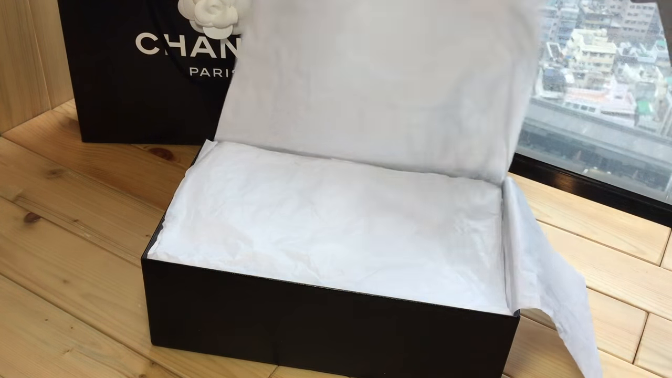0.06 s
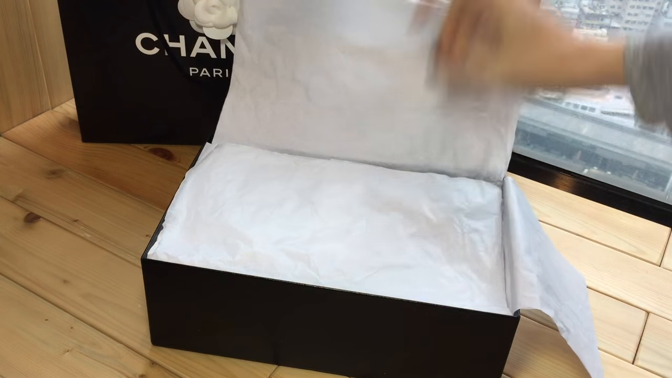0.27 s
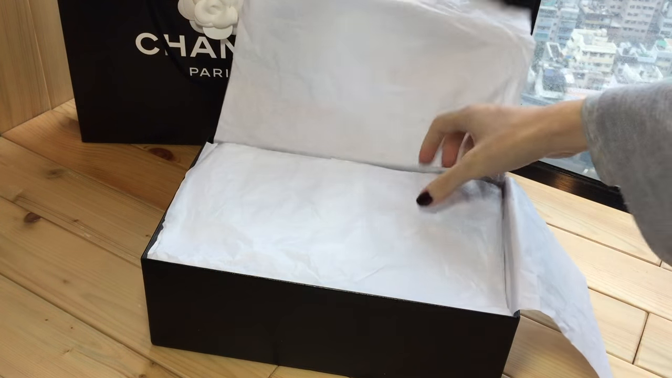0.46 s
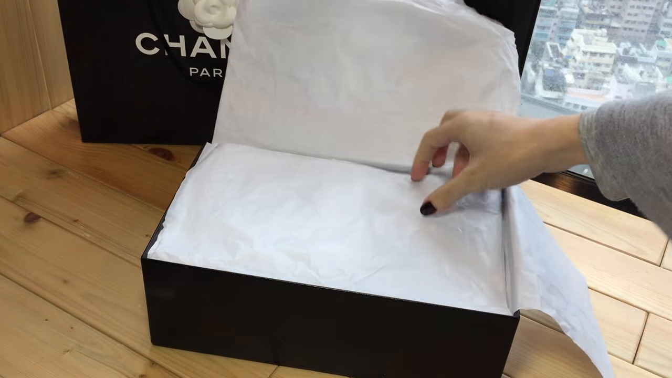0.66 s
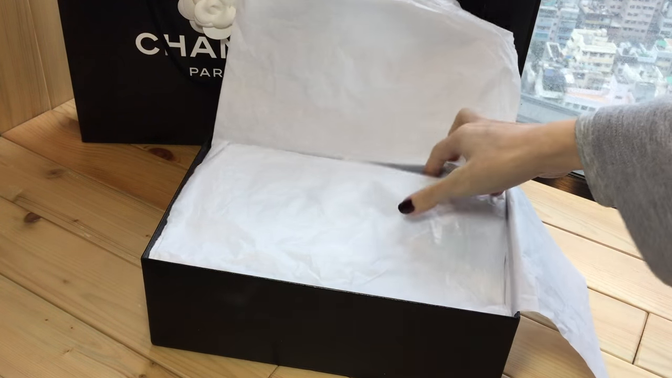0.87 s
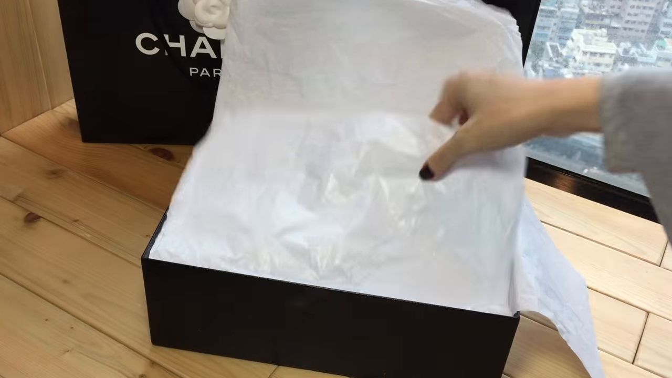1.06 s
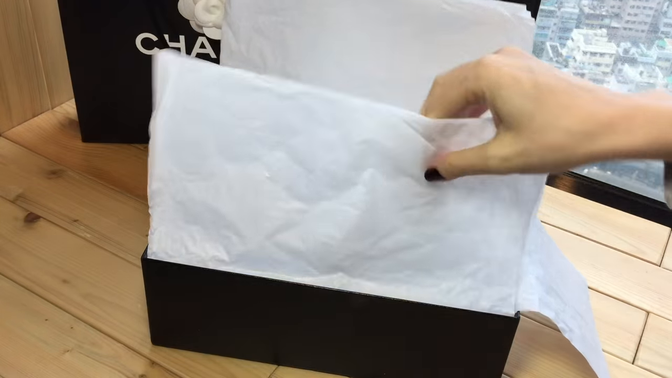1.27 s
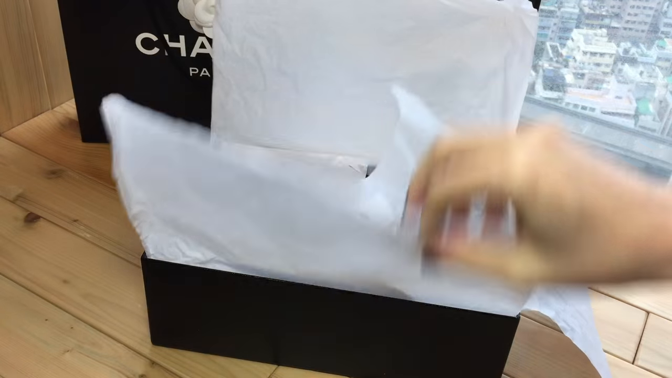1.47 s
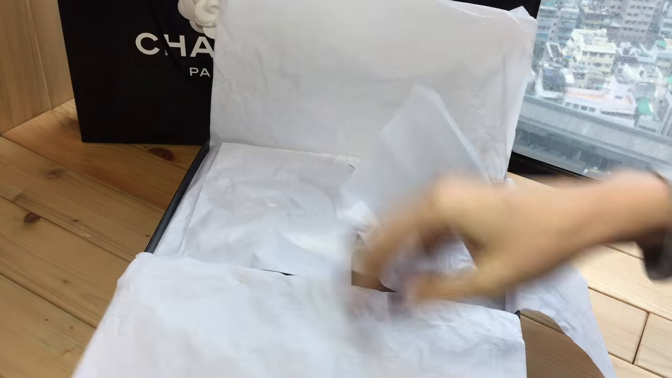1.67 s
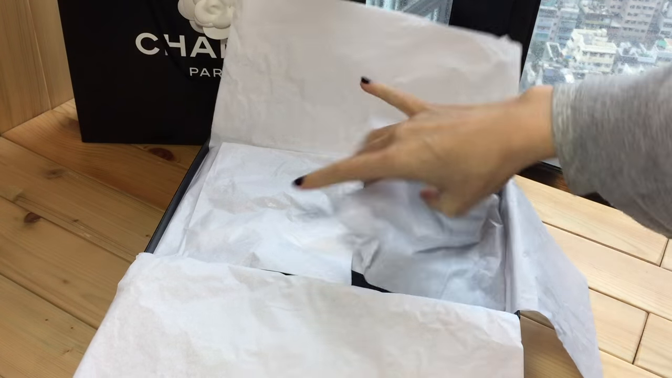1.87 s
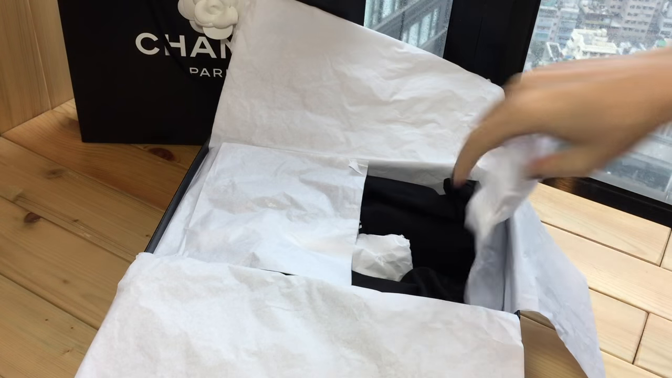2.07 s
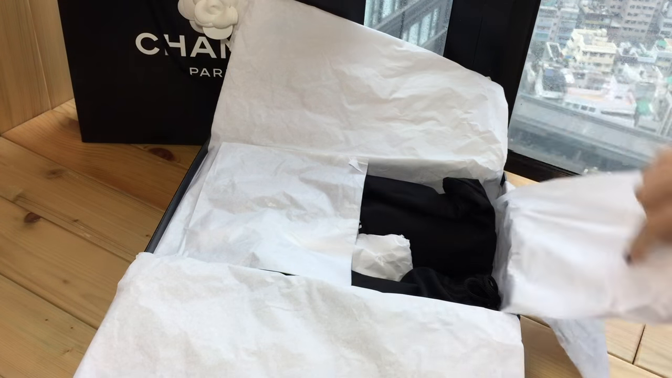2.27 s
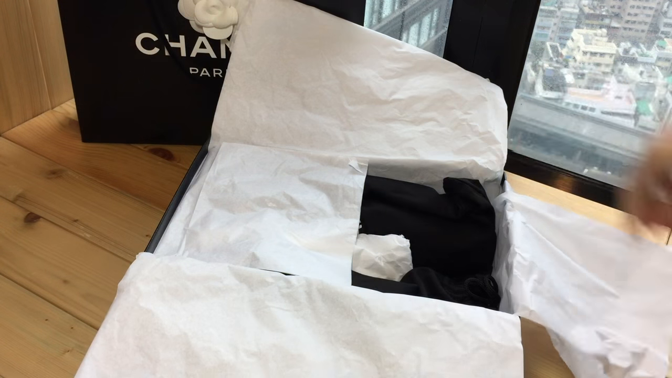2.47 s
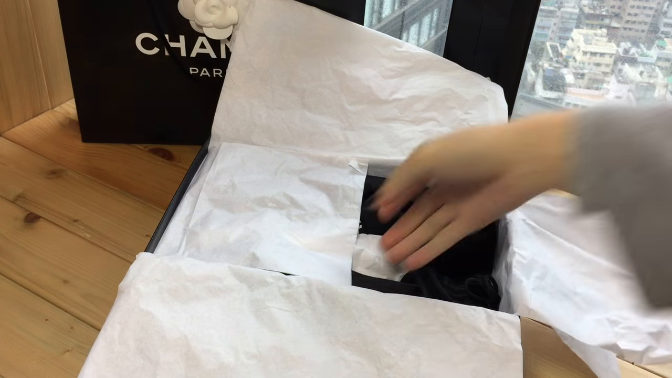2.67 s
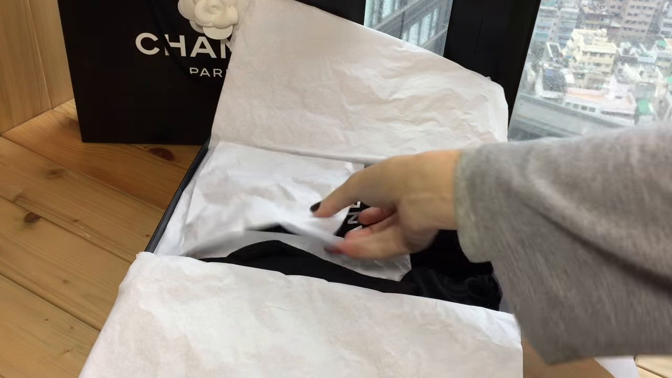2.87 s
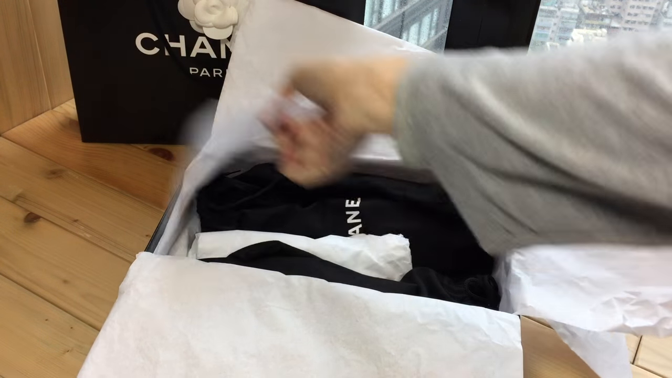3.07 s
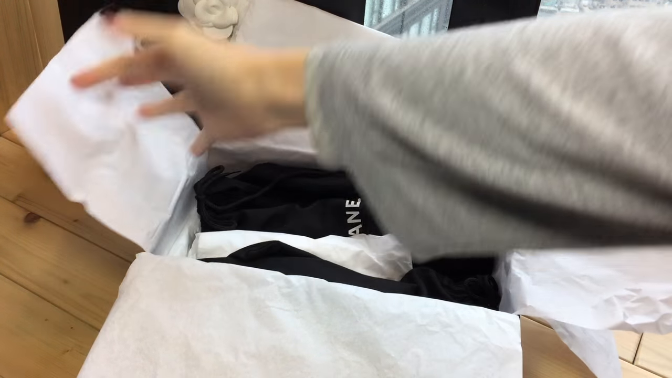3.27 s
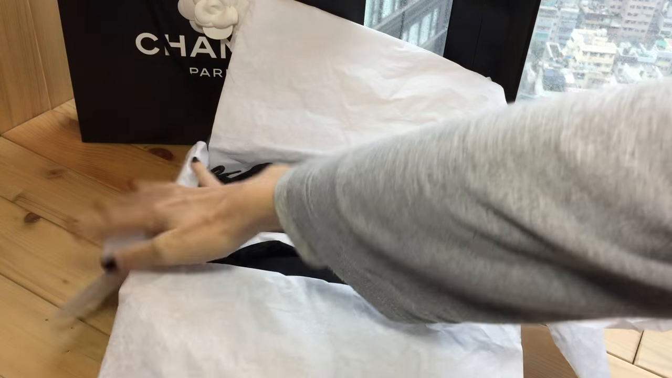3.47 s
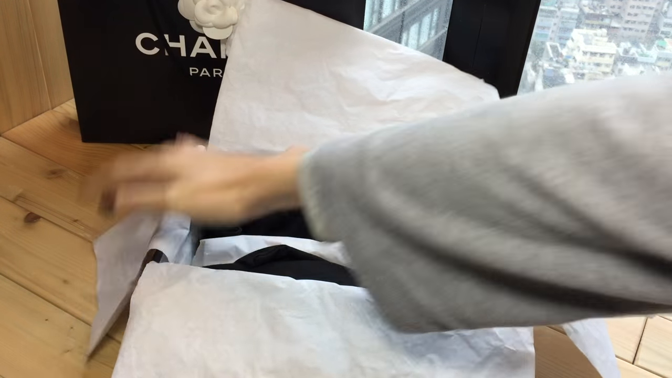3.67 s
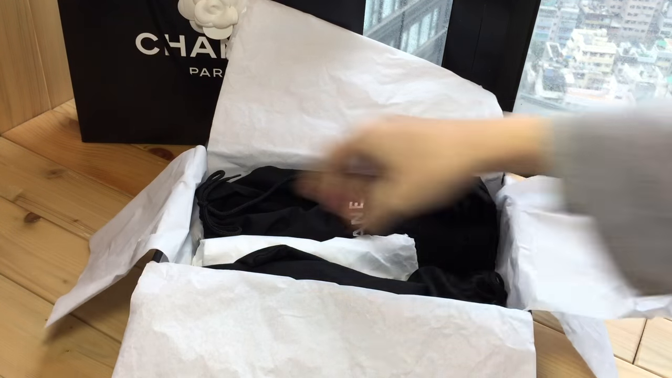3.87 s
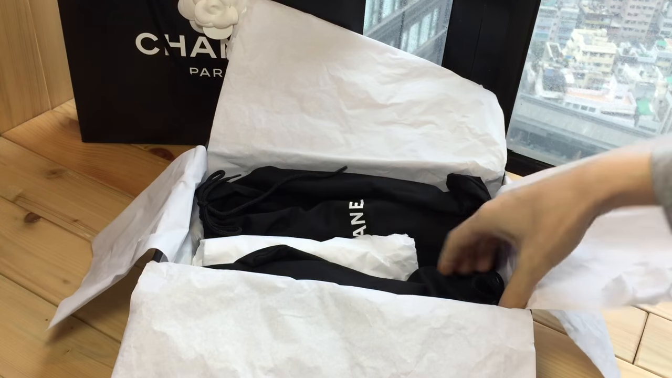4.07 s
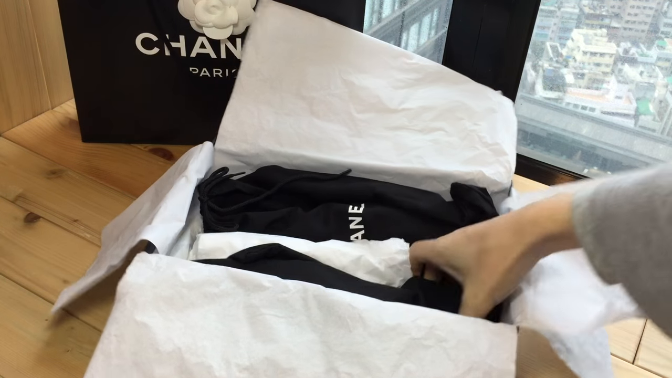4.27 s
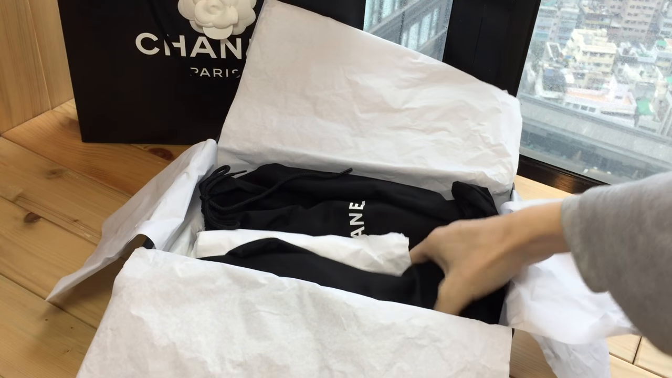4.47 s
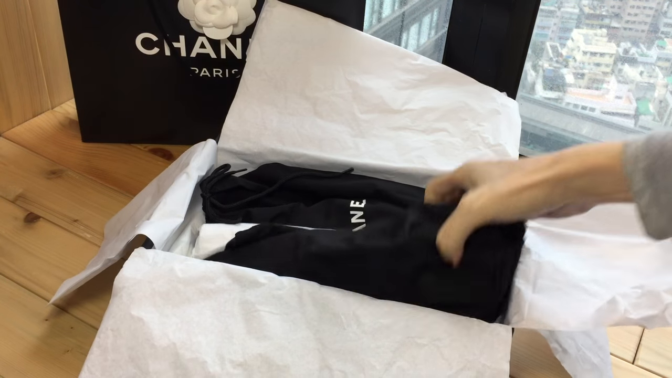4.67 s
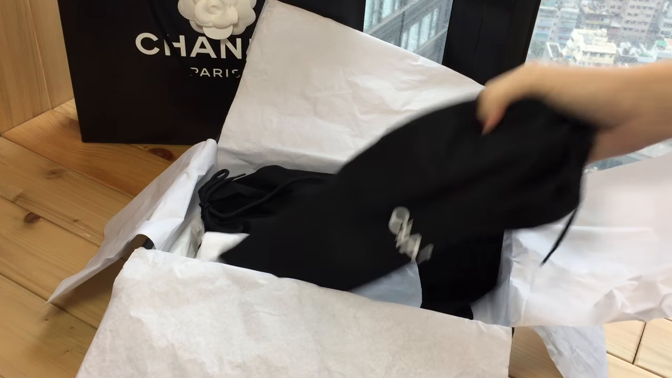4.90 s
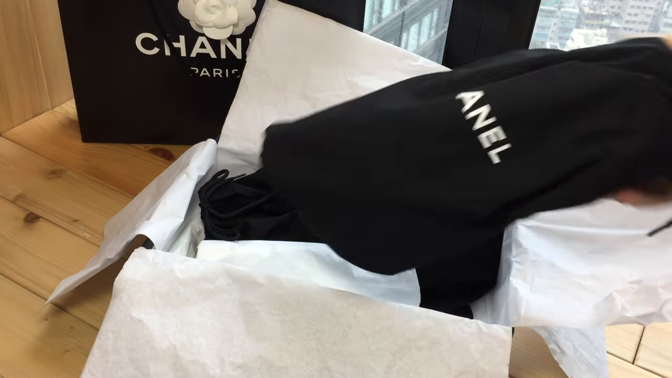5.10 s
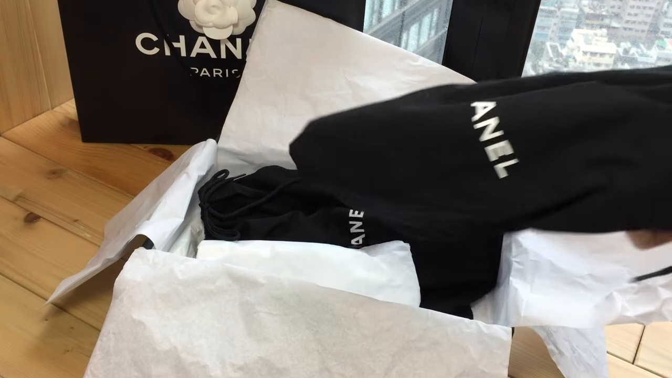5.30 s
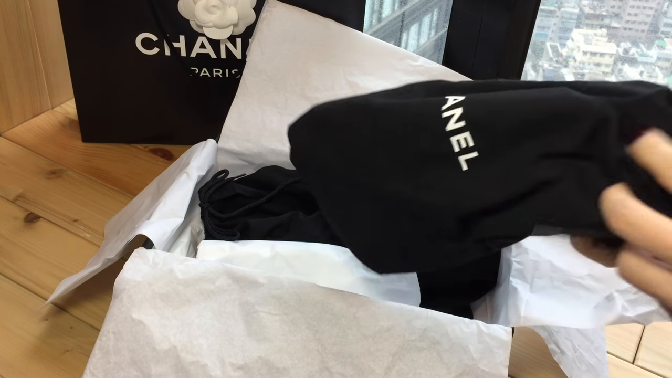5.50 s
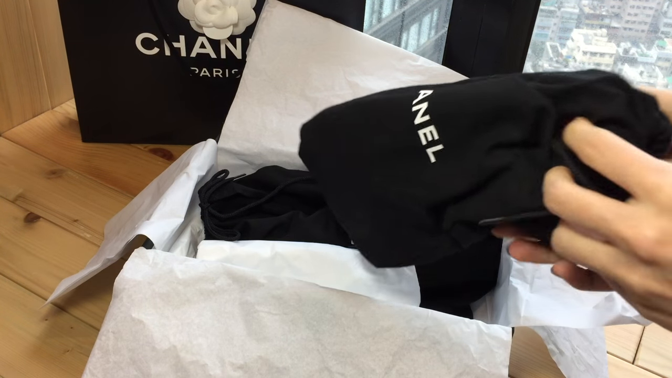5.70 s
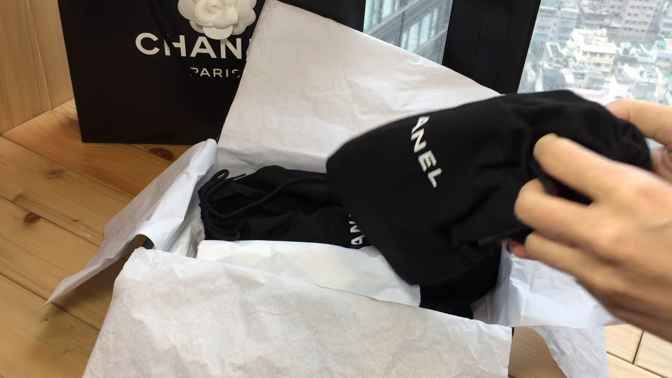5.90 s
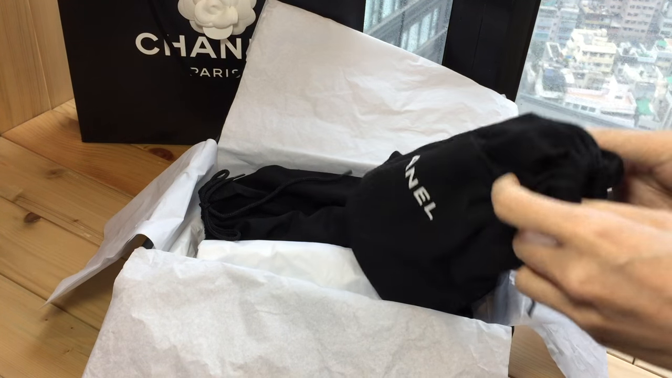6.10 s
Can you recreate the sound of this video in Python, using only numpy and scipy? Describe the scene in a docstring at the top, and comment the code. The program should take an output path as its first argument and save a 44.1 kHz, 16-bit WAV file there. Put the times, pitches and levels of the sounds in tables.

```python
"""Hands unfold tissue paper in a cardboard box and lift out a cloth bag, in a quiet room.
A low rumble and faint hiss, both shaped noise, lie under it all. From the start, strokes of the hand rustle
the paper (a swarm of creases), folds crackle (decaying sprays), creases tick, and fingers knock the resonant box.
From 4.3 to 5.08 s the bag slides along the box and shakes it more; at 5.33 s a faint narrow tone swells as it
is turned. After a near-silence, faint rustle returns at 5.84 s, and faint folds and knocks near 6.1 s."""
import sys
import numpy as np
from scipy import signal
from scipy.fft import rfft, irfft, next_fast_len
from scipy.io import wavfile
from scipy.ndimage import uniform_filter1d, map_coordinates

SR = 44100
rng = np.random.default_rng(int(sys.argv[2]) if len(sys.argv) > 2 else 0)


def generate_wav(sig):
    """Save sig (samples, or channels by samples) to the path in sys.argv[1] as 16-bit PCM at SR."""
    pcm = np.round(np.clip(np.atleast_2d(sig).T, -1, 1) * 32767).astype(np.int16)
    wavfile.write(sys.argv[1], SR, pcm)


N = 271038


def amp(db):
    """Level law: decibels to an amplitude gain."""
    return 10 ** (np.asarray(db) / 20)


def unit(x):
    """Normalisation: the signal scaled to rms 1."""
    return x / np.sqrt(np.mean(x ** 2) + 1e-20)


def along(points, hz):
    """Logarithmic interpolation: (Hz, value) points joined on a log frequency axis."""
    f, value = np.transpose(points)
    return np.interp(np.log(hz + 1), np.log(f + 1), value)


def wobble(rate):
    """Slow modulation: a smooth random curve with rate knots a second."""
    knots = rng.standard_normal(int(N * rate / SR) + 4)
    return map_coordinates(knots, [np.arange(N) * rate / SR])


def filtered(x, response):
    """Linear filtering: the spectrum of x times a response of frequency."""
    m = next_fast_len(len(x) + 4096)
    spectrum = rfft(x, m) * response(np.fft.rfftfreq(m, 1 / SR))
    return irfft(spectrum, m)[:len(x)]


def resonance(f, hz, width):
    """Damped oscillator: one causal resonance of peak gain 1."""
    return 1j * f * width / (hz * hz - f * f + 1j * f * width + 1e-9)


def below(f, corner):
    """Band division: a share near 1 below the corner and near 0 above it."""
    return 1 / (1 + (f / corner) ** 4)


def add_at(out, s, sound):
    """Superposition: a sound added into out from the time s."""
    out[round(s * SR):][:len(sound)] += sound


# Spectrum of the building and city rumble: f/Hz, relative density/dB per Hz
RUMBLE_SPECTRUM = [(15, -48.5), (38, -29), (46, -17), (54, 0), (64, -9.5), (75, -18.5), (95, -3.5),
                   (115, -13), (160, -18.5), (220, -23), (320, -31), (500, -38), (900, -120)]
# Spectrum of the hiss: f/Hz, relative density/dB per Hz
HISS_SPECTRUM = [(150, -11), (300, -1.5), (700, 2), (2000, -0.5), (3000, -3.5), (5000, -34), (10000, -18),
                 (16000, -18)]
# Wavering of the rumble: t/s, level/dB (before a common +1.5 dB)
RUMBLE_SWELL = [(0.0, -58), (0.38, -59), (1.01, -62), (1.69, -58.5), (2.19, -60), (3.42, -58.5),
                (4.19, -59.5), (4.59, -59.5), (6.15, -61.5)]


def background():
    """Stationary noise: a wavering rumble of the building and the city, and a soft hiss."""
    rumble = unit(filtered(rng.standard_normal(N), lambda f: amp(along(RUMBLE_SPECTRUM, f))))
    hiss = unit(filtered(rng.standard_normal(N), lambda f: amp(along(HISS_SPECTRUM, f))))
    swell_db = np.interp(np.arange(N) / SR, *np.transpose(RUMBLE_SWELL))
    drift_db = 0.8 * wobble(4)
    return amp(swell_db + 1.5) * rumble + amp(-74.5 + drift_db) * hiss


# Reverberation time of the room: f/Hz, t60/s
ROOM_T60 = [(200, 0.35), (2000, 0.34), (6000, 0.4), (15000, 0.15)]


def room(x):
    """Reverberation: convolution with noise whose every frequency decays at its own rate."""
    hz, t, z = signal.stft(rng.standard_normal(SR // 2), SR, nperseg=256)
    decay = amp(-60 * t / along(ROOM_T60, hz)[:, None])
    tail = signal.istft(z * decay, SR, nperseg=256)[1]
    delayed = np.pad(x, (200, 0))  # the reverberation starts 200 samples late
    return signal.fftconvolve(delayed, tail / np.linalg.norm(tail))[:N]


# Faint tone as the bag is turned: t/s of its middle, time/s from there to 1/e, f/Hz, width/Hz, level/dB
BAG_TONE = (5.33, .06, 1800, 60, -77)


def faint_tone():
    """Narrow-band noise: a twice-applied resonance under a bell-shaped envelope."""
    s, half, hz, width, db = BAG_TONE
    tone = unit(filtered(rng.standard_normal(N), lambda f: resonance(f, hz, width) ** 2))
    return amp(db) * tone * np.exp(-((np.arange(N) / SR - s) / half) ** 2)


# Resonances of the cardboard and its air: f/Hz, width/Hz, relative level/dB
BOX_MODES = [(200, 35, -2), (280, 25, 4), (460, 40, -6), (630, 50, -3), (715, 30, -3), (1000, 90, -10),
             (1230, 80, -10)]


def walls(f):
    """Modal superposition: the resonances of the cardboard box add with alternating sign."""
    return sum((-1) ** k * amp(g) * resonance(f, hz, width) for k, (hz, width, g) in enumerate(BOX_MODES))


# The bag slides along the box: start t/s, end t/s, edge/s, relative gain/dB of the shaking
BAG_DRAG = (4.3, 5.08, 0.066, 15.3)
BOXED_DB = -22  # overall rms of the shaken walls relative to the rustle


def boxed(paper):
    """Forced vibration: the rustling paper shakes the walls it lies against."""
    start, end, edge, db = BAG_DRAG
    t = np.arange(N) / SR
    sliding = np.clip(np.minimum(t - start, end - t) / edge, 0, 1)
    force = paper * amp(db * sliding + 3 * wobble(25))
    ring = filtered(force, lambda f: walls(f) * resonance(f, 850, 500))
    return amp(BOXED_DB) * ring * np.std(paper) / np.std(ring)


# Fingers on the box: t/s, peak level/dB, f/Hz of the struck wall, t60/s of the push
FINGER_KNOCKS = [(0.164, -41, 304, 0.1), (0.473, -35.5, 480, 0.074), (0.579, -40.5, 565, 0.05),
                 (0.646, -37, 734, 0.085), (0.672, -38.5, 284, 0.098), (0.793, -27, 600, 0.038),
                 (0.807, -33, 298, 0.04), (0.877, -33.5, 275, 0.06), (1.246, -37.5, 440, 0.12),
                 (2.063, -40, 198, 0.24), (2.289, -37.5, 360, 0.086), (2.825, -38.5, 596, 0.036),
                 (2.841, -37.5, 616, 0.065), (3.06, -39, 300, 0.12), (3.118, -36, 587, 0.13),
                 (3.694, -22.5, 194, 0.022), (3.722, -44, 255, 0.15), (4.151, -35.5, 690, 0.05),
                 (6.082, -57, 650, 0.089), (6.122, -60, 610, 0.08)]
DAMP_T60 = 0.14  # s, extra decay: the resting hand and the paper damp the walls


def knocks():
    """Impact excitation: a soft blow shakes the box, with the struck wall's pitch favoured."""
    out, t = np.zeros(N + SR), np.arange(SR // 4) / SR
    for s, db, hz, t60 in FINGER_KNOCKS:
        push = rng.standard_normal(len(t)) * amp(-60 * t / t60)
        push[:8] += 6  # the first contact
        ring = filtered(push, lambda f: walls(f) * (0.45 + resonance(f, hz, 0.3 * hz)))
        ring = ring * amp(-60 * t / DAMP_T60)
        add_at(out, s, amp(db) * ring / np.abs(ring).max())
    return out[:N]


# Spectrum of the paper: f/Hz, relative density/dB per Hz
PAPER_SPECTRUM = [(150, -12), (400, -14), (1000, -9.5), (2000, -0.5), (4000, 1.5), (7000, 0.5),
                  (16000, -2.5)]


def sheet_response(f):
    """Radiation spectrum: the gain of the paper sheet at each frequency."""
    return amp(along(PAPER_SPECTRUM, f))


# Single creases snapping: t/s, nominal peak level/dB, ringing f/Hz, ringing level/dB relative to the crack
CREASE_TICKS = [(0.4286, -35, 1700, -12), (0.9827, -21, 3630, -12), (1.1233, -30, 1930, -1),
                (1.696, -20, 4300, -9), (1.9646, -19.5, 8400, -17), (1.9865, -18, 6700, -29),
                (2.5616, -34, 3360, -9), (2.6824, -48, 11800, -2), (2.7112, -30, 2330, -1.5),
                (2.837, -27, 4690, -7), (2.9358, -27.5, 2060, -5), (3.5995, -20.5, 4000, -16),
                (4.0253, -54, 2950, -10), (4.0612, -50, 3140, -9), (4.1964, -35, 5880, -19),
                (5.164, -56, 4680, -12), (6.088, -53, 2500, 2)]
CRACK_T60, TICK_T60 = 0.019, 0.042  # s, decay of the crack and of the taut patch


def ticks():
    """Snap-through: one crease flips with a brief crack, and the taut patch beside it rings."""
    out, t = np.zeros(N + SR), np.arange(SR // 4) / SR
    for s, db, hz, ring_db in CREASE_TICKS:
        emphasis = lambda f: f / (f + 1500) * (1.2 + resonance(f, hz, 0.31 * hz))
        crack = filtered(rng.standard_normal(len(t)), lambda f: sheet_response(f) * emphasis(f))
        ring = filtered(rng.standard_normal(len(t)), lambda f: resonance(f, hz, 0.086 * hz))
        cracking = unit(crack) * amp(-60 * t / CRACK_T60)
        ringing = unit(ring) * amp(ring_db - 60 * t / TICK_T60)
        add_at(out, s, amp(db - 10) * (cracking + ringing))  # from nominal peak to rms
    return out[:N]


def creases(count, spread_db, smooth):
    """Granular noise: brief sprays of very unequal size, blended with even friction noise."""
    sizes_db = np.minimum(spread_db * rng.exponential(size=count // 16 + 2), 14)
    sizes = np.interp(np.arange(count) / 16, np.arange(len(sizes_db)), amp(sizes_db))
    sprays = rng.standard_normal(count) * sizes
    return unit(unit(sprays) + smooth * rng.standard_normal(count))


# Colour of the paper in hand: t/s, dullness level/dB of the slack folds, brightness level/dB of the tight creases
PAPER_COLOUR = [(0.0, -4.5, 1), (0.5, -0.5, 4), (0.7, 2.5, -7), (0.82, 4.5, -2.5), (1.07, -6.5, -1),
                (1.3, -4, 4.5), (1.56, -5, 2), (1.75, -7, 1.5), (2.04, -4.5, 5), (2.5, -6.5, 0),
                (2.9, 0, 2.2), (3.28, -5.5, 1.5), (3.7, -4, -3.5), (4.14, -7, -1), (4.5, -1.5, 1),
                (4.9, -3, 3.5), (5.199, -7.5, -1), (6.07, -11, -15.5)]


def colour(s):
    """Spectral balance: dullness and brightness in dB at the given times."""
    at, *columns = np.transpose(PAPER_COLOUR)
    return [np.interp(s, at, column) for column in columns]


# Strokes of the hand, one list each, from first touch until the hand lets go:
# t/s, rustle level/dB (before a common -4.5 dB)
HAND_STROKES = [
    [(0.0, -42.5), (0.112, -45.5), (0.166, -39), (0.31, -54), (0.336, -64)],
    [(0.478, -29.5), (0.55, -47), (0.676, -56.5), (0.78, -64.5)],
    [(0.796, -37), (0.854, -52.5), (1.04, -43), (1.214, -41), (1.246, -39.5), (1.376, -47.5), (1.414, -42),
     (1.576, -53)],
    [(1.6, -42), (1.73, -44.5)],
    [(1.968, -40.5), (2.034, -42), (2.17, -52), (2.3, -41.5), (2.364, -44.5), (2.374, -38.5), (2.516, -46)],
    [(2.814, -47), (2.906, -53), (2.946, -47.5), (3.018, -56.5), (3.144, -42), (3.212, -49.5),
     (3.262, -37.5), (3.306, -42.5)],
    [(3.398, -54), (3.53, -32), (3.678, -54.5)],
    [(3.694, -33)],
    [(4.105, -73), (4.125, -46.5), (4.183, -49.5), (4.325, -49.5), (4.351, -43.5), (4.455, -52.5),
     (4.595, -50.5), (4.915, -46), (5.03, -43.5), (5.083, -45)],
    [(5.84, -72), (5.9, -69.5), (5.95, -72.5)],
]
TOUCH_S, TOUCH_DB = 0.0043, 7.5  # s, dB: a stroke starts TOUCH_DB lower and rises within TOUCH_S
LET_GO_DB_PER_S, STIR_DB = 172, -75  # the released sheet settles at this speed, down to a faint stir


def strokes():
    """Envelope law: each stroke rises quickly and, once the hand lets go, settles linearly in dB."""
    t, out = np.arange(N) / SR, np.zeros(N)
    for rows in HAND_STROKES:
        s, db = np.transpose(rows)
        settling_db = LET_GO_DB_PER_S * np.maximum(t - s[-1], 0)
        touch_db = TOUCH_DB * np.clip(1 - (t - s[0]) / TOUCH_S, 0, 1)
        level = np.interp(t, s, db) - settling_db - touch_db
        out = np.where(t >= s[0], level, out)  # a new stroke replaces the last
    return np.maximum(out, STIR_DB)


SMALL_DB, SMALL_SPREAD_DB = 9, 2.5  # dB, mean nominal peak over the stroke level, and its scatter
SMALL_HZ, SMALL_S = 3000, 0.022  # Hz, s: median colour and length


def small_folds(count):
    """Random point process: lesser folds buckle at chance moments, as strong as the hand moves."""
    s, draw = rng.random(count) * (N - 1) / SR, rng.standard_normal((count, 3))
    db = strokes()[(s * SR).astype(int)] + SMALL_DB + SMALL_SPREAD_DB * draw[:, 0]
    hz = SMALL_HZ * 1.74 ** draw[:, 1]
    length = SMALL_S * 1.58 ** draw[:, 2]
    return list(zip(s, db, hz, length))


# The loudest buckling folds: t/s, nominal peak level/dB, strongest f/Hz, length/s (to -60 dB)
BUCKLING_FOLDS = [(0.007, -30, 2290, 0.035), (0.0377, -25, 2550, 0.058), (0.129, -25, 1620, 0.066),
                  (0.156, -19, 7100, 0.088), (0.4713, -21.5, 3400, 0.11), (0.5953, -31, 2220, 0.16),
                  (0.6636, -29, 2680, 0.048), (0.7882, -28.5, 1747, 0.086), (0.8699, -29, 2260, 0.045),
                  (1.035, -27.5, 3890, 0.072), (1.1536, -21, 1980, 0.046), (1.172, -21, 1560, 0.044),
                  (1.2475, -23, 2580, 0.13), (1.325, -24.5, 3840, 0.029), (1.415, -20.5, 5700, 0.033),
                  (1.441, -27.5, 4350, 0.093), (1.591, -23.5, 1940, 0.03), (1.732, -24.5, 2800, 0.024),
                  (2.0067, -25.5, 2520, 0.11), (2.092, -24.5, 4200, 0.1), (2.129, -25, 6040, 0.041),
                  (2.202, -25.5, 4630, 0.024), (2.2215, -27.5, 3030, 0.085), (2.278, -17.5, 4400, 0.074),
                  (2.373, -19, 8500, 0.047), (2.41, -25, 4740, 0.066), (2.437, -21, 3210, 0.041),
                  (2.454, -27, 3040, 0.032), (2.5, -22, 2470, 0.045), (2.81, -26, 3860, 0.047),
                  (2.949, -24.5, 2580, 0.015), (2.997, -27.5, 5500, 0.02), (3.061, -25, 7510, 0.052),
                  (3.109, -24, 2590, 0.046), (3.141, -27.5, 1630, 0.059), (3.242, -21.5, 11900, 0.066),
                  (3.3005, -25.5, 1720, 0.072), (3.446, -31.5, 2760, 0.096), (3.496, -25.5, 5690, 0.13),
                  (3.53, -17.5, 6160, 0.05), (3.685, -17.5, 4200, 0.065), (4.122, -24.5, 5600, 0.036),
                  (4.151, -27, 3030, 0.065), (4.343, -43, 1810, 0.11), (4.413, -29.5, 2800, 0.026),
                  (4.6736, -30, 2240, 0.07), (4.763, -30, 1890, 0.052), (4.921, -30.5, 3710, 0.13),
                  (4.967, -27, 3000, 0.024), (4.983, -25.5, 4200, 0.09), (5.052, -21, 2600, 0.031),
                  (6.084, -44.5, 2460, 0.056), (6.088, -47, 5330, 0.061), (6.126, -47, 4220, 0.065)]
FOLD_DULL_DB, FOLD_DULL_GROWS = 16, 1.47  # low boost in dB at dullness 0, and its growth per dB of dullness
RISE = 0.076  # time constant of the outbreak as a share of the fold's length


def crackles():
    """Buckling instability: a sudden spray of snaps dies away, coloured at the fold's own pitch."""
    out, t = np.zeros(N + SR), np.arange(SR // 4) / SR
    for s, db, hz, length in list(BUCKLING_FOLDS) + small_folds(count=90):
        spray = creases(count=len(t), spread_db=2.5, smooth=0.3)
        dull_db = FOLD_DULL_DB + FOLD_DULL_GROWS * colour(s)[0]
        slack = lambda f: 1 + (amp(dull_db) - 1) * below(f, 1300)
        pitch = lambda f: 0.82 + 1.12 * resonance(f, hz, 0.084 * hz)
        tone = unit(filtered(spray, lambda f: sheet_response(f) * slack(f) * pitch(f)))
        shape = amp(-60 * (t / length) ** 1.31) * (1 - np.exp(-t / (RISE * length)))
        add_at(out, s, amp(db - 13.0) * tone * shape / shape.max())  # from nominal peak to rms
    return out[:N]


def patchy(x, depth_db):
    """Time-frequency modulation: parts of the sheet speak in turn, so the colour drifts in patches."""
    z = signal.stft(x, nperseg=256)[2]
    field = uniform_filter1d(rng.standard_normal(z.shape), 8, axis=0)  # across frequency
    field = uniform_filter1d(field, 16, axis=1)  # across time
    return unit(signal.istft(z * amp(depth_db * unit(field)), nperseg=256)[1][:len(x)])


def crinkles(count):
    """Free vibration: small patches of paper pop at random, each a few cycles at its own pitch."""
    draw, t = rng.random((count, 4)), np.arange(SR // 50) / SR
    hz = 600 * 15 ** draw[:, 1:2]  # 600 to 9000 Hz
    life = (2.5 + 8 * draw[:, 2:3]) / hz  # decay constant of 2.5 to 10.5 cycles
    strength = amp(-5 * np.log(draw[:, 3:] + 0.012))  # few strong, many weak
    pops = strength * np.sin(2 * np.pi * hz * t) * np.exp(-t / life)
    at = (draw[:, :1] * N).astype(int) + np.arange(len(t))
    return unit(np.bincount(at.ravel(), pops.ravel())[:N])


def rustle():
    """Stochastic emission: clumped creases; slack folds give the low part, tight creases the high part."""
    dull_db, bright_db = colour(np.arange(N) / SR)
    clumps = amp(0.49 * wobble(30) + 0.84 * wobble(120))
    swarm = patchy(clumps * creases(count=N, spread_db=2, smooth=0.8), depth_db=2.0)
    sheet = filtered(swarm, sheet_response)
    low = filtered(sheet, lambda f: below(f, 1300))
    high = filtered(sheet, lambda f: 1 - below(f, 7000))
    middle = sheet - low - high
    body = unit(middle) + amp(-10.0) * crinkles(count=3000)
    coloured = body + amp(dull_db) * unit(low) + amp(bright_db) * unit(high)
    return amp(strokes() - 4.5) * coloured


def scene():
    """Superposition: paper and box with their reverberation, over the background."""
    paper, folds, snaps, box = rustle(), crackles(), ticks(), knocks()
    echo = room(amp(-6) * folds + amp(-9) * snaps + amp(-7.5) * box)
    direct = paper + boxed(paper) + folds + snaps + box
    return (direct + echo + faint_tone() + background())[None]


# Dips from the microphone housing: f/Hz, half width/Hz (where the dB depth halves), level/dB
HOUSING_DIPS = [(4880, 180, -4), (7460, 400, -2.5), (10460, 127, -9)]
TOP_HZ = 15750  # band limit


def record(dry):
    """Transfer function: the microphone housing cuts a few dips; nothing is kept above the band limit."""
    dips_db = lambda f: sum(db / (1 + ((f - hz) / width) ** 2) for hz, width, db in HOUSING_DIPS)
    return filtered(dry[0], lambda f: amp(dips_db(f)) * (f < TOP_HZ))[None]


dry = scene()
out = record(dry)
generate_wav(out)
```